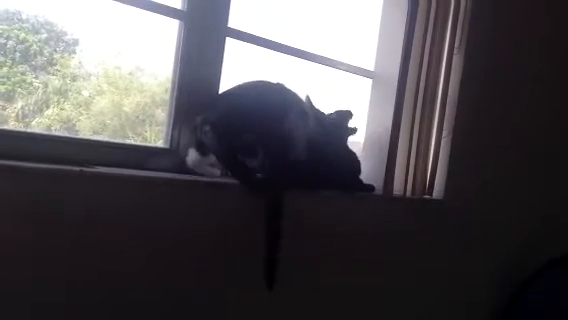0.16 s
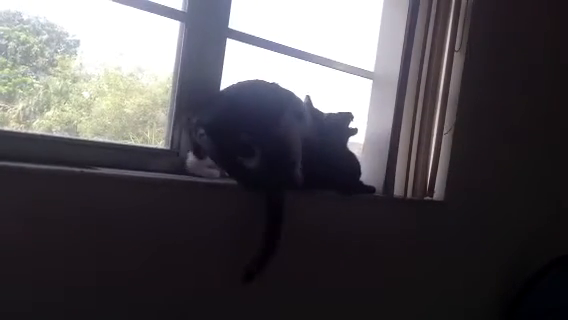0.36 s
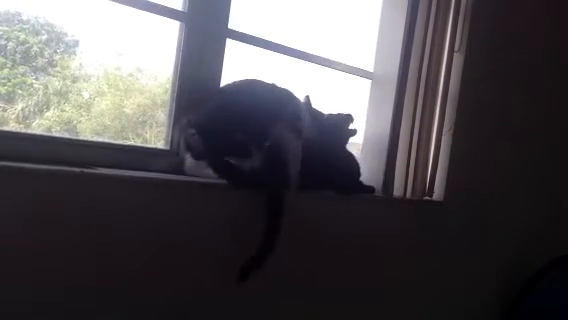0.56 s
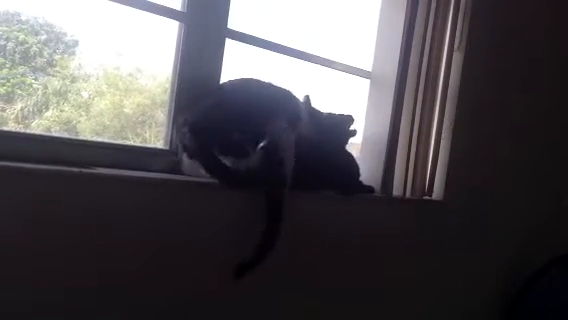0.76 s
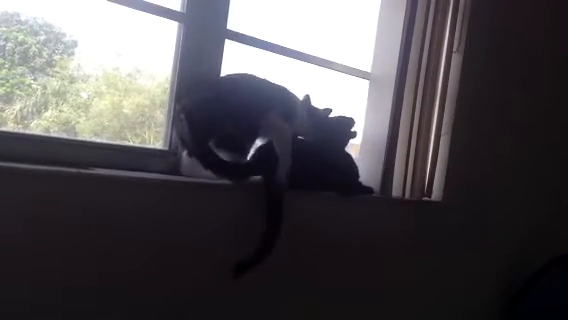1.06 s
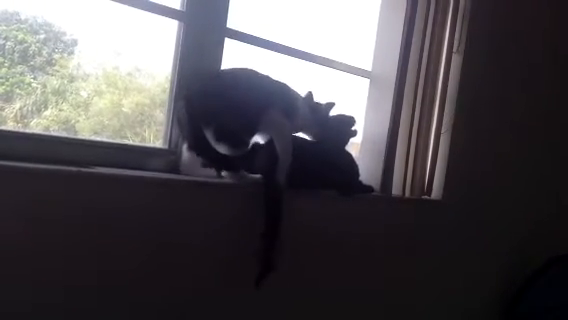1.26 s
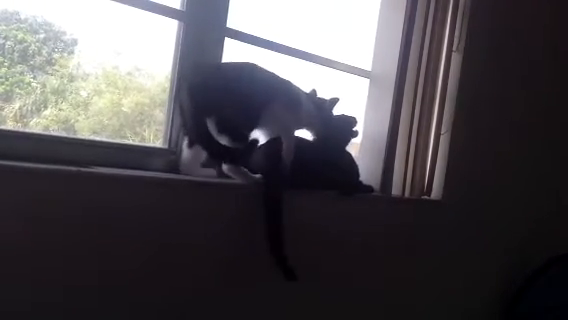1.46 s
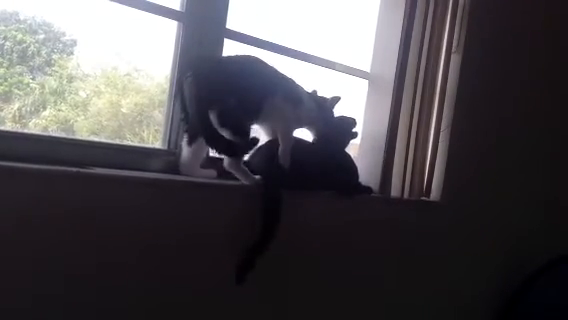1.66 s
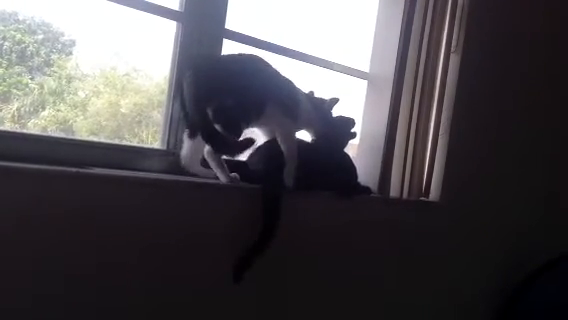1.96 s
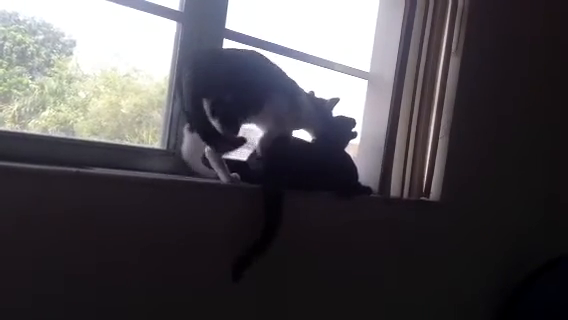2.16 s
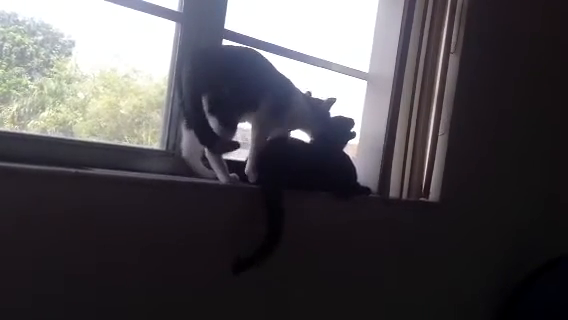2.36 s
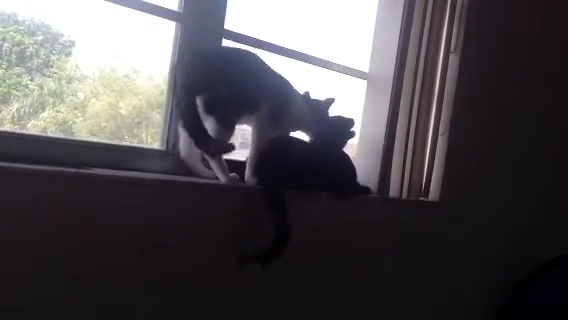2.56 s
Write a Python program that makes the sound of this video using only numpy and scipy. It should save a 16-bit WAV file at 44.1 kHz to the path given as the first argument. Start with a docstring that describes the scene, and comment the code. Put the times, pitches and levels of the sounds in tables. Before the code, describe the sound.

A cat yowls at another, silent cat in a small bare room. Thin, airy rising whines until 0.15 s, then a piercing yowl starts, dips, jumps up near 0.4 s and cracks repeatedly to a lower, blaring register until 1.2 s. It sinks steadily, turning rough and raspy from 1.6 s, ending about 2.5 s. Faint claw ticks near 1 and 1.45 s, soft bump at 2.4 s, airy wheeze after 2.55 s.

```python
"""A cat's yowl, aimed at another cat that stays silent, from a window sill in a small bare room.
Two sets of harmonics make the voice: it keeps breaking to a lower register, where the third harmonic
meets the mouth resonance and mostly blares; then the pitch sinks and pulsed noise frays the tone to a rasp.
Thin, airy whines rise before it, a faint wheeze of air noise follows; noise makes a few ticks and a soft bump.
Narrow resonances colour the cat, a short noise tail is the room, and steady noise is the room tone."""
import sys
import numpy as np
from scipy import signal
from scipy.fft import rfft, irfft, next_fast_len
from scipy.io import wavfile
from scipy.ndimage import map_coordinates

SR = 44100
rng = np.random.default_rng(int(sys.argv[2]) if len(sys.argv) > 2 else 0)


def put_to_file(sound):
    """Save the sound as 16-bit audio at rate SR, in the file named by the first command-line argument."""
    columns = np.atleast_2d(sound).T  # one column per channel
    safe = np.clip(columns, -1, 1)
    whole_steps = np.round(safe * 32767)
    wavfile.write(sys.argv[1], SR, whole_steps.astype(np.int16))


N = 119070

# Steady room tone: colour_hz, gain_db
ROOM_TONE_COLOUR = [(25, -35), (45, -23), (80, -16.5), (110, 1), (160, 1), (240, 2.5), (330, -2),
                    (500, -8.5), (1000, -10.5), (2500, -14), (4500, -15), (8000, -18.5), (12000, -21),
                    (15000, -23)]
ROOM_TONE_DB = -60.5
# How fast the room dies away: band_hz, t60_s
ROOM_DECAY = [(200, 0.21), (2000, 0.53), (8000, 0.2)]
ROOM_DB, WALL_BUILDUP_S = -7.5, .004  # tail against direct sound; fade-in of the tail
# Narrow resonances of the window recess: centre_hz, peak_db
RECESS_MODES = [(788, -8), (842, -7), (925, -4), (967, -7), (1178, -3), (1374, -5), (1522, -6), (1852, -3),
                (1906, -1), (2157, -4), (2201, -1), (2321, 1), (2398, -3), (2458, 1), (2529, 0), (2620, -4),
                (2677, -3), (2800, -3)]
RECESS_WIDTH_HZ = 8.6

# Claws on the sill: start_s, level_db
TICKS = [(1.0, -50), (1.453, -38), (1.487, -42)]
# Colour of the ticks: colour_hz, gain_db
TICK_COLOUR = [(30, -25), (100, -3), (300, 21), (4000, 8), (14000, -15.5)]
TICK_T60_S = .009
# Colour of the soft bump on the sill: colour_hz, gain_db
BUMP_COLOUR = [(30, -40), (70, -23), (110, -5), (150, -4.5), (230, -7.5), (400, -12), (900, -40.5)]
BUMP_S, BUMP_DB, BUMP_WIDTH_S = 2.423, -48, .012  # peak time, level, rise and fall constant

# Faint wheezes, the last one only air: start_s, end_s, first_pitch_hz, last_pitch_hz, tone_db, air_db
WHEEZES = [(-.03, .04, 510, 587, -50, -57), (.04, 0.151, 568, 676, -57, -56),
           (2.556, 2.753, 590, 650, -94, -61.5)]
# Colour of the wheezes' air: colour_hz, gain_db
WHEEZE_AIR_COLOUR = [(600, -13.5), (1500, -5), (2100, -3), (2500, 10.5), (2800, 4), (3050, -24.5),
                     (5000, -48)]
# Resonances on the wheezes' tone: colour_hz, gain_db
WHEEZE_TONE_COLOUR = [(550, -7.5), (1200, -1.5), (1700, 6), (2300, -1.5), (2800, -6), (3300, -9.5),
                      (6000, -27)]

# Pitch of the yowl's high register: time_s, pitch_hz
YOWL_PITCH = [(.16, 947), (.21, 886.5), (.25, 847), (.29, 807.7), (.365, 803), (.385, 929.2), (.58, 944.5),
              (.67, 977.3), (.75, 985.5), (.88, 950.6), (.95, 926), (1.06, 923), (1.13, 889.7),
              (1.24, 849.6), (1.36, 826.3), (1.5, 789.3), (1.58, 783.6), (1.645, 801.7), (1.75, 777),
              (1.87, 718), (2.0, 688), (2.15, 636.3), (2.43, 613)]
# Drive of the yowl's harmonics: time_s, fundamental_db, second_db, third_db, top_db
YOWL_EFFORT = [(.15, -92, -97, -72, -82), (.18, -50, -57, -37.5, -60), (.2, -60, -54, -30, -41.5),
               (.214, -64.5, -52, -41, -34.5), (.238, -44, -56, -23, -31.5), (.26, -47.5, -51, -33.5, -33),
               (.315, -43.5, -48, -25, -26.5), (.37, -48.5, -48.5, -25.5, -29),
               (.39, -45.5, -46.5, -35, -32), (.56, -46, -39.5, -38.5, -30.5),
               (.66, -46.5, -43, -38.5, -33.5), (.73, -48.5, -41.5, -43.5, -37.5),
               (.9, -48.5, -41, -42, -38.5), (1.05, -47.5, -44, -44.5, -38), (1.1, -50, -43, -48, -42),
               (1.22, -45, -44.5, -43, -40), (1.4, -44, -52.5, -46, -41.5),
               (1.55, -46.5, -48, -43.5, -39.5), (1.75, -46, -46, -45, -40),
               (1.86, -54.5, -48.5, -56, -43.5), (2.08, -53.5, -48.5, -54, -41),
               (2.25, -74, -48.5, -51, -43), (2.44, -63.5, -53, -40, -44), (2.5, -67, -75, -48, -52),
               (2.55, -100, -95, -90, -101)]
# Roughness of the vocal folds: time_s, pitch_jitter_share, flutter_share, rasp_db
FOLD_ROUGHNESS = [(.15, 0.0083, .1, -91), (.24, 0.023, 0.25, -67.5), (.31, 0.01864, 0.37, -62),
                  (.6, 0.02, 0.33, -59.5), (.71, 0.01127, 0.31, -54), (1.0, 0.01412, 0.31, -60),
                  (1.3, 0.0075, 0.21, -67), (1.45, 0.019, 0.53, -71), (1.57, 0.033, 0.48, -58),
                  (1.66, 0.0327, 0.69, -47.5), (1.8, 0.0376, 0.6, -43.5), (2.05, 0.039, 0.77, -46.5),
                  (2.22, 0.043, 0.93, -43), (2.42, 0.051, .9, -43), (2.48, 0.056, 0.97, -74)]
# Voice breaks: middle_s, length_s, pitch_drop_share, third_harmonic_push_db
VOICE_BREAKS = [(.409, .022, .14, 8), (.456, .016, .145, 6), (.505, .028, .17, 8), (.549, .026, .175, 11),
                (.595, .024, .19, 9), (.642, .014, .19, 7), (.77, .022, .18, 6), (.843, .018, .12, 2),
                (.922, .012, .12, -1), (.968, .024, .16, 4), (1.02, .02, .16, 6), (1.155, .018, .14, 2),
                (1.205, .018, .09, 4)]
# Throat and mouth on the third and higher harmonics: resonance_hz, gain_db
THROAT = [(1750, -34), (1900, 4), (2150, 11), (2330, 1), (2520, -4.5), (2780, -8.5), (3300, -21),
          (3600, -19), (4000, -32), (4900, -38), (5400, -32.5), (5750, -28), (6100, -32), (6600, -32),
          (7600, -57.5), (12000, -69.5)]
# Colour of the rasp: colour_hz, gain_db
RASP_COLOUR = [(300, -44), (650, -12), (950, -13), (1150, -8.5), (1400, -6), (1650, -35.5), (1900, 3),
               (2500, -4), (2850, -1.5), (3350, -4), (3700, -21.5), (4200, -30), (5200, -33), (5750, -30),
               (6200, -30.5), (7000, -27), (9000, -71)]
# Air in the mouth's upper resonances: colour_hz, gain_db
HISS_COLOUR = [(3000, -25), (5300, -16.5), (5780, 14), (6100, -13), (6500, -12), (7000, -12.5),
               (8000, -29.5)]
HISS_DB = -33.5  # against the top harmonics' drive
# Knots a second of the random pitch and fuzz curves; slow waver as a share of pitch
JITTER_PER_S, FLUTTER_PER_S, WAVER_PER_S, WAVER = 600, 330, 70, 0.00623
SHIMMER_DB, SHIMMER_PER_S = 1, 250
BASE_FLUTTER_POWER = 4.4  # the fundamental only flutters when the voice is very rough
TOP_FLUTTER = 1.9  # the top harmonics are always fuzzier
LOW_BASE_DB, LOW_SECOND_DB = -2, -6.5  # low register against the high one
DUCK_DB = -9  # dip of the high register in a break
BREAK_JITTER, BREAK_RASP_DB = 0.0122, 9.5  # extra roughness: low register's jitter, rasp in a break
RASP_PULSING = 0.97  # depth of the once-a-cycle gating
RASP_GRAIN_DB, RASP_GRAIN_PER_S = 1.5, 180  # the rasp comes in coarse, uneven puffs
TOP_HZ = 15320  # the microphone's band limit


def amp(db):
    """Decibels to gain."""
    return 10 ** (np.asarray(db) / 20)


def unit(x):
    """Scale to rms 1."""
    return x / np.sqrt(np.mean(x ** 2) + 1e-20)


def along(points, hz):
    """Read (Hz, value) points on a log frequency axis."""
    f, v = np.transpose(points)
    return np.interp(np.log(np.abs(hz) + 1), np.log(f + 1), v)


def clock():
    """The time of every sample in seconds."""
    return np.arange(N) / SR


def curves(rows):
    """Draw one automation curve for each column after the time."""
    s, *columns = np.transpose(rows)
    return [np.interp(clock(), s, column) for column in columns]


def wobble(rate):
    """A smooth random curve with rate knots a second."""
    return map_coordinates(rng.standard_normal(N // 8), [clock() * rate], mode="wrap")


def filtered(x, response):
    """Shape x by a response of frequency."""
    m = next_fast_len(N + SR // 2)
    return irfft(rfft(x, m) * response(np.fft.rfftfreq(m, 1 / SR)), m)[:N]


def noise(colour, gate=1):
    """Gate white noise, then colour it and scale it to rms 1."""
    return unit(filtered(gate * rng.standard_normal(N), lambda hz: amp(along(colour, hz))))


def window(middle, length):
    """A flat-topped window with soft edges, at half gain length apart."""
    return 1 / (1 + np.abs(2 * (clock() - middle) / length) ** 6)


def room_tone():
    """The quiet, steady noise bed of the room."""
    return amp(ROOM_TONE_DB) * noise(ROOM_TONE_COLOUR)


def room(x):
    """The direct sound plus the walls' answer, each frequency dying at its own speed."""
    hz, t, grains = signal.stft(rng.standard_normal(SR // 2), SR, nperseg=256)
    decay = amp(-60 * t / along(ROOM_DECAY, hz)[:, None])
    tail = signal.istft(grains * decay, SR, nperseg=256)[1]
    tail = tail * np.clip(np.arange(len(tail)) / SR / WALL_BUILDUP_S, 0, 1)
    wet = signal.fftconvolve(x, tail / np.linalg.norm(tail))[:N]
    return (x + amp(ROOM_DB) * wet) / np.hypot(1, amp(ROOM_DB))


def recess(x):
    """The window recess rings at narrow resonances on top of the direct sound."""
    def response(f):
        total = 1  # the direct sound
        for centre_hz, peak_db in RECESS_MODES:
            damping = 1j * f * RECESS_WIDTH_HZ
            total = total + amp(peak_db) * damping / (centre_hz ** 2 - f * f + damping)
        return total
    return filtered(x, response)


def paws():
    """Dry, sharply decaying ticks and a dull noise bump as the cat shifts its weight."""
    t = clock()
    ticks = sum((t >= s) * amp(db - 60 * np.abs(t - s) / TICK_T60_S) for s, db in TICKS)
    swell = amp(BUMP_DB) * np.exp(-np.abs(t - BUMP_S) / BUMP_WIDTH_S)
    # a gentle low cut, around 90 Hz
    bump = filtered(swell * noise(BUMP_COLOUR), lambda hz: 1 - np.exp(-(hz / 90) ** 2))
    return ticks * noise(TICK_COLOUR) + bump


def partial(phase, flutter):
    """One harmonic of about rms 1; random flutter spreads it into a fuzzy band."""
    shiver = flutter * (wobble(FLUTTER_PER_S) + 1j * wobble(FLUTTER_PER_S)) / np.sqrt(2)
    return np.sqrt(2) * np.imag((1 + shiver) * np.exp(1j * phase)) / np.hypot(1, flutter)


def harmonics(phase, pitch, flutter, colour, order, count):
    """Stack count harmonics from order up, each weighted by the resonance it passes through."""
    total = 0
    for k in range(order, order + count):
        total = total + amp(along(colour, k * pitch)) * partial(k * phase, flutter)
    return total


def wheezes(jitter=0.013, flutter=0.93):
    """Thin, airy, rising whines of fuzzy harmonics before the yowl; after it only a faint wheeze of air noise."""
    out = np.zeros(N)
    for start, end, first_hz, last_hz, tone_db, air_db in WHEEZES:
        pitch = np.interp(clock(), [start, end], [first_hz, last_hz])
        phase = 2 * np.pi * np.cumsum(pitch * (1 + jitter * wobble(JITTER_PER_S))) / SR
        tone = unit(harmonics(phase, pitch, flutter, WHEEZE_TONE_COLOUR, order=1, count=5))
        breath = amp(tone_db) * tone + amp(air_db) * noise(WHEEZE_AIR_COLOUR)
        out += window((start + end) / 2, end - start) * breath
    return out


def register(pitch, jitter, flutter, base_db, second_db, third_db, top_db):
    """One mode of the vocal folds, with unsteady pitch and level: its tone and its phase."""
    unsteady = 1 + WAVER * wobble(WAVER_PER_S) + jitter * wobble(JITTER_PER_S)
    phase = 2 * np.pi * np.cumsum(pitch * unsteady) / SR
    tone = amp(base_db) * partial(phase, np.abs(flutter) ** BASE_FLUTTER_POWER)
    tone += amp(second_db) * partial(2 * phase, flutter)
    tone += amp(third_db) * harmonics(phase, pitch, flutter, THROAT, order=3, count=1)
    tone += amp(top_db) * harmonics(phase, pitch, flutter + TOP_FLUTTER, THROAT, order=4, count=10)
    return tone * amp(SHIMMER_DB * wobble(SHIMMER_PER_S)), phase


def yowl():
    """The high register holds on while a lower one bursts in at each break; air rasps through once a cycle."""
    (pitch,) = curves(YOWL_PITCH)
    base_db, second_db, third_db, top_db = curves(YOWL_EFFORT)
    jitter, flutter, rasp_db = curves(FOLD_ROUGHNESS)
    _, drop, push_db = curves(VOICE_BREAKS)
    broken = sum(window(middle, length) for middle, length, _, _ in VOICE_BREAKS)

    high, phase = register(pitch, jitter, flutter, base_db, second_db, third_db, top_db)
    low, _ = register(pitch * (1 - drop), jitter + BREAK_JITTER, flutter,
                      base_db + LOW_BASE_DB, second_db + LOW_SECOND_DB, third_db + push_db, top_db)

    puffs_db = rasp_db + BREAK_RASP_DB * broken + RASP_GRAIN_DB * wobble(RASP_GRAIN_PER_S)
    rasp = amp(puffs_db) * noise(RASP_COLOUR, 1 + RASP_PULSING * np.cos(phase))
    hiss = amp(top_db + HISS_DB) * noise(HISS_COLOUR)
    return amp(DUCK_DB * broken) * high + broken * low + rasp + hiss


def scene():
    """The cat in the window recess of the room, over a quiet room tone."""
    cat = yowl() + wheezes() + paws()
    return (room(recess(cat)) + room_tone())[None]


def record(dry):
    """The microphone keeps nothing above its band limit."""
    return filtered(dry[0], lambda hz: hz < TOP_HZ)[None]


dry = scene()
out = record(dry)
put_to_file(out)
```